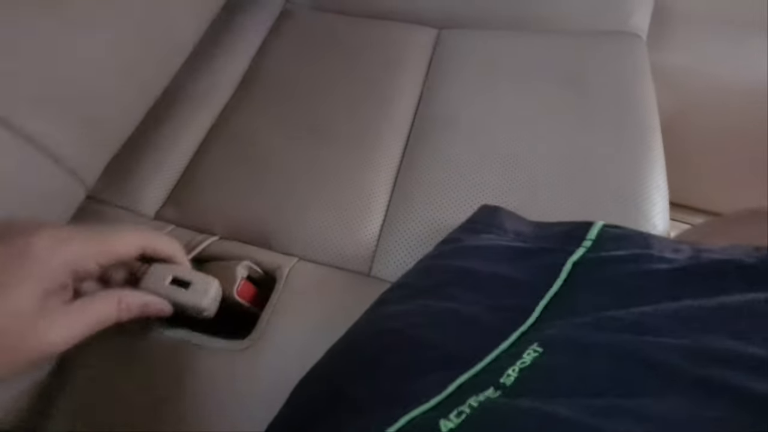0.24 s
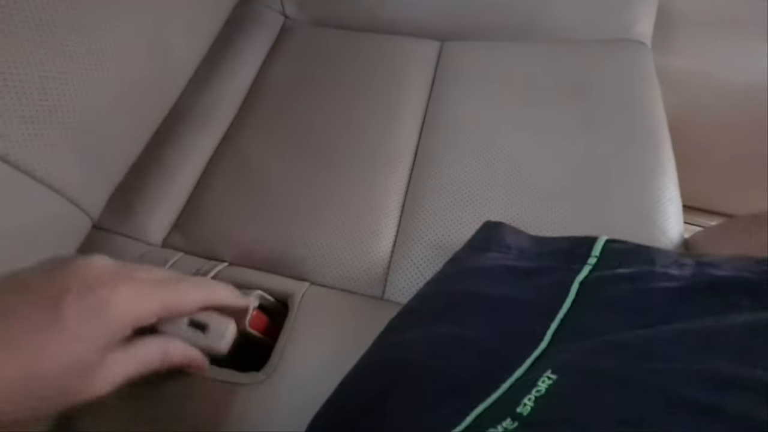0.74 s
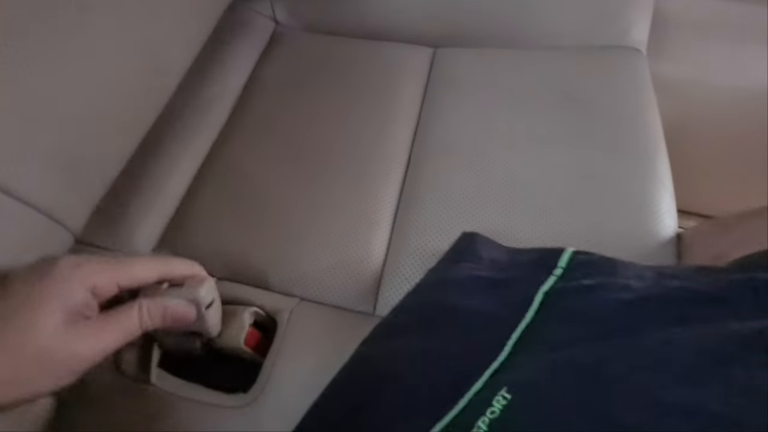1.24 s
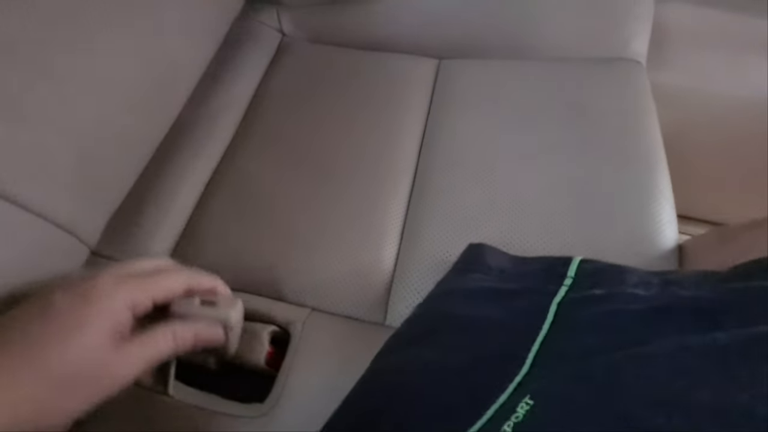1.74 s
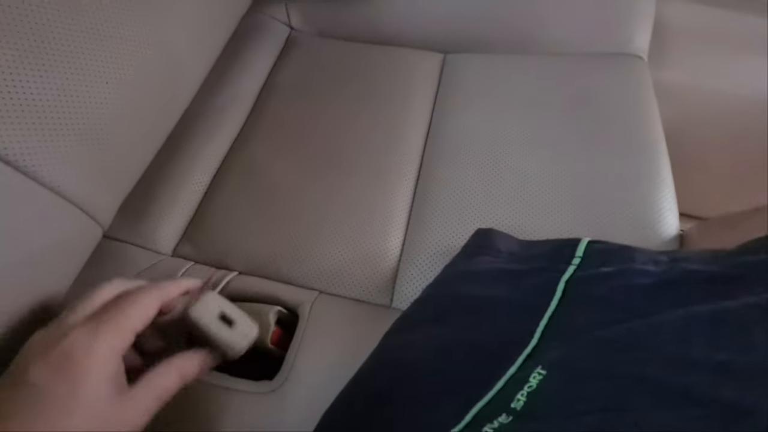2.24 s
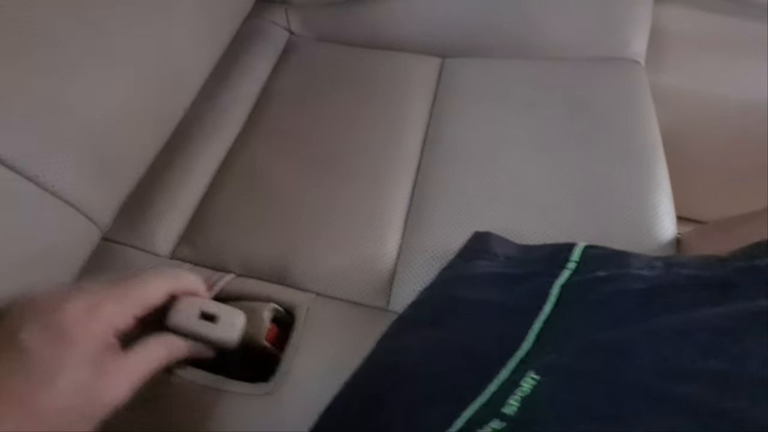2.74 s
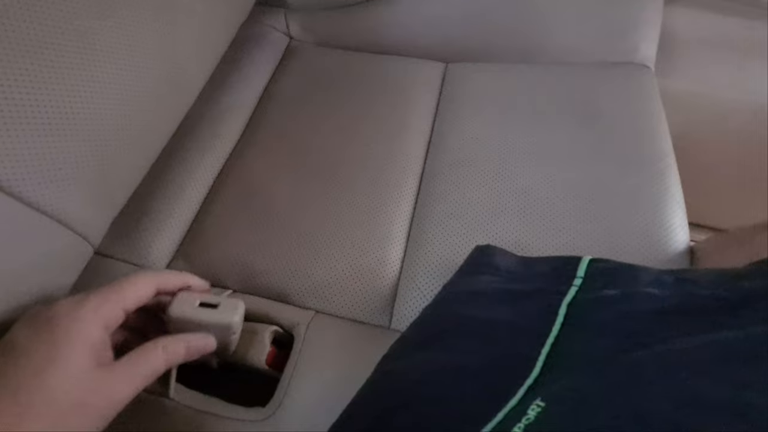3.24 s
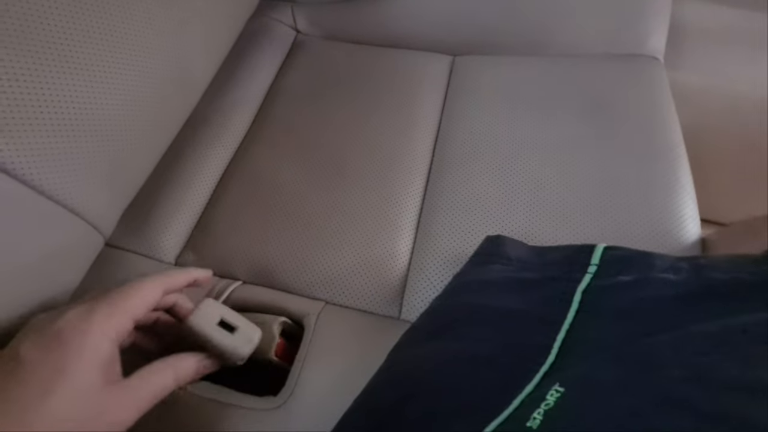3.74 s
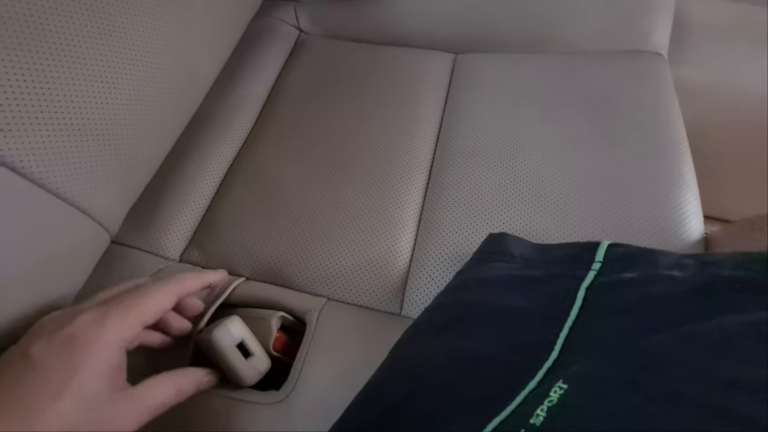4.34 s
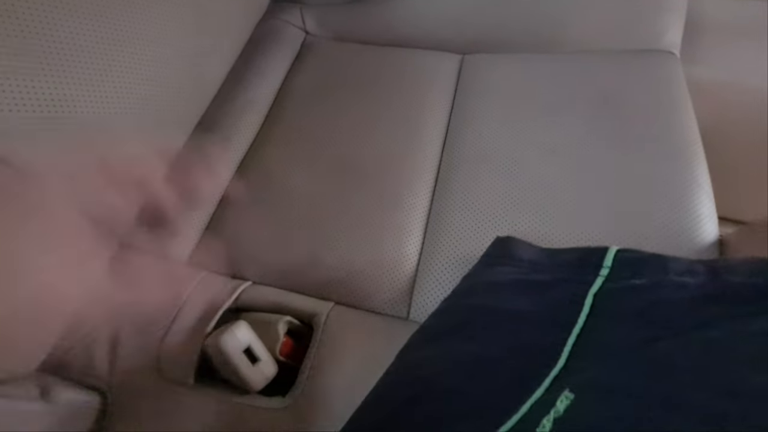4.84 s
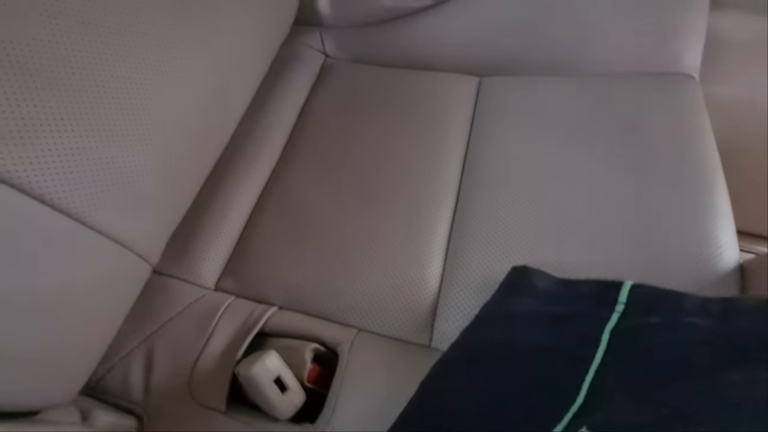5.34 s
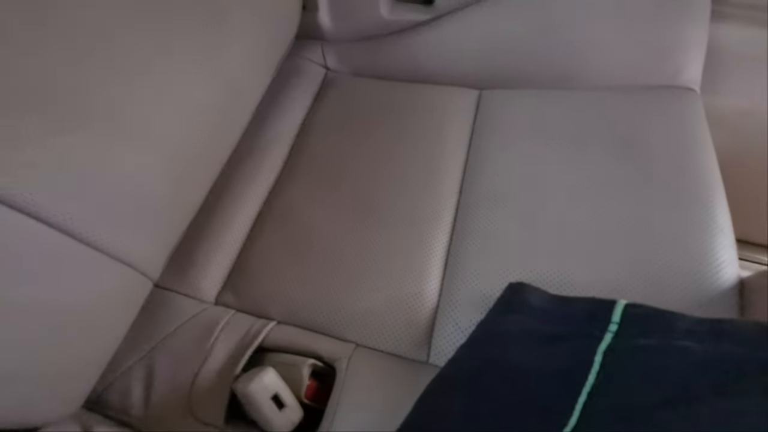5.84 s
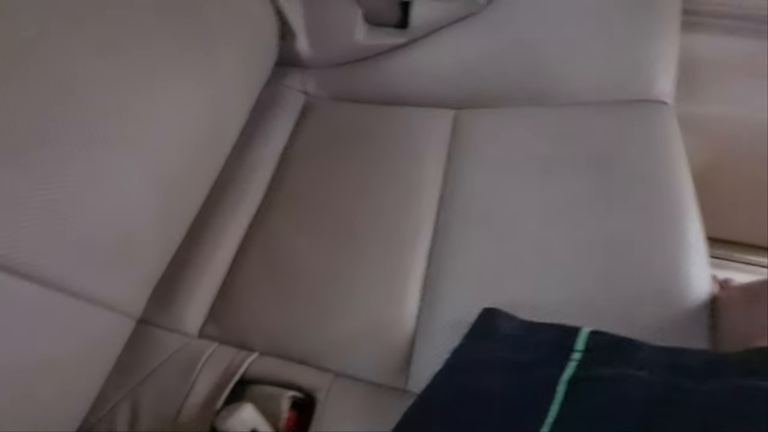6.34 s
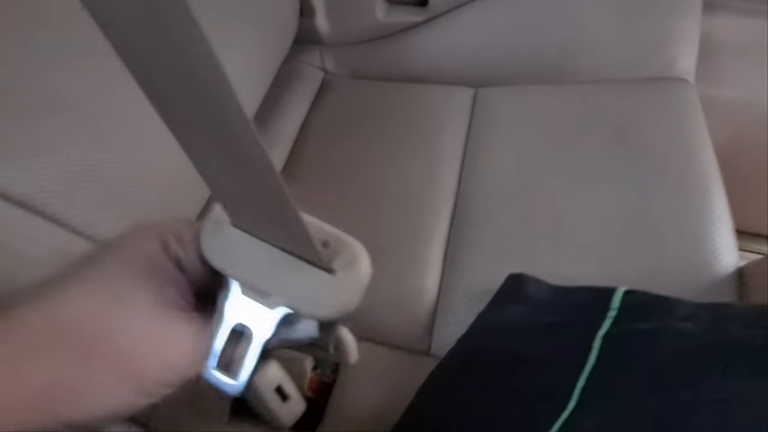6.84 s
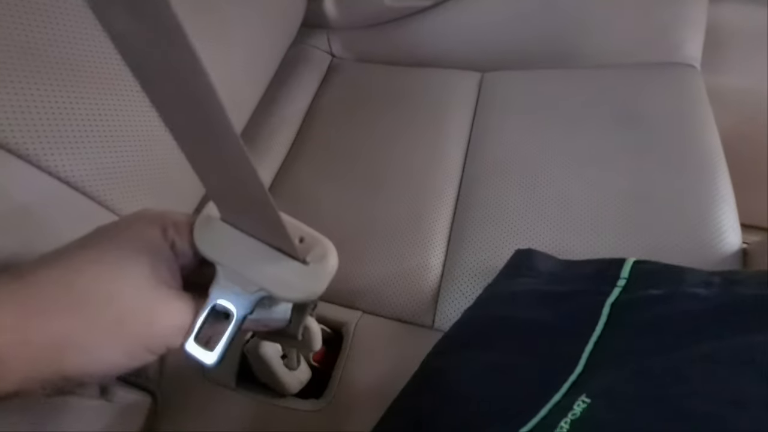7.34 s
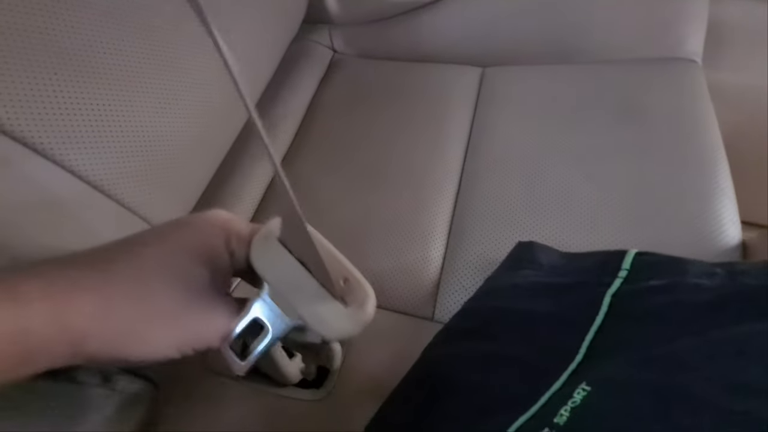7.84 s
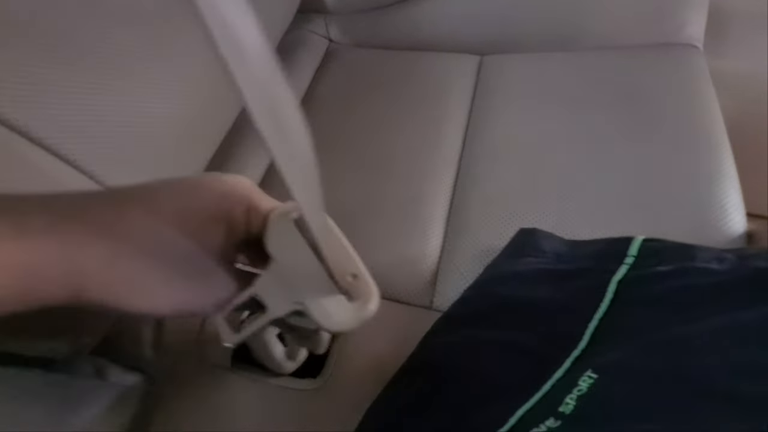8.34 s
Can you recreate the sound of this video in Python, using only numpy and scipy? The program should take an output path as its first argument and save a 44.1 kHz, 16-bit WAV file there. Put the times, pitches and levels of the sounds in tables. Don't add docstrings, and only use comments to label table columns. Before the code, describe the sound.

Inside a quiet parked car, a hand fiddles with a plastic seat-belt buckle, which clatters loudly, then belt webbing whirs out and a metal latch clicks.

```python
import sys
import numpy as np
from scipy import signal
from scipy.fft import rfft, irfft, next_fast_len
from scipy.io import wavfile
from scipy.ndimage import map_coordinates

SR = 44100
rng = np.random.default_rng(int(sys.argv[2]) if len(sys.argv) > 2 else 0)


def unload_audio(sound):
    columns = np.transpose(np.atleast_2d(sound))
    steps = np.round(np.clip(columns, -1, 1) * 32767)
    wavfile.write(sys.argv[1], SR, steps.astype(np.int16))


def boost(x):
    u = np.asarray(x, float) / 20
    return 10 ** u


N = 377937

# time in seconds, effort in dB.
EFFORT = [(0, -0.5), (.4, -4.5), (1.1, 3.5), (1.55, -1.5), (2.0, -1.5), (2.33, -5.5), (2.47, -13),
          (2.75, 1), (3.1, 0), (3.4, -12), (3.65, -8), (4.4, -18), (5.4, -17.5), (6.05, -10.5), (6.45, -9),
          (6.9, -16), (8.57, -18)]
# time in seconds, weave rate in Hz, tone level in dB.
PULL_CURVE = [(6.08, 320, -84), (6.19, 513, -69), (6.27, 705, -78), (6.385, 1030, -70), (6.49, 1180, -68),
              (6.54, 1160, -70), (6.6, 970, -72), (6.72, 450, -65), (6.86, 230, -84)]
PORT_SHARES = (0.74, 0.79, 1)


def unit(x):
    return x / np.sqrt(np.mean(x ** 2) + 1e-20)


def along(points, hz):
    f, v = np.transpose(points)
    return np.interp(np.log(hz + 1), np.log(f + 1), v)


def curves(rows, silent=-130):
    s, *cols = np.transpose(rows)
    return [np.interp(np.arange(N) / SR, s, c, silent, silent) for c in cols]


def wobble(rate):
    at = np.arange(0, N + 6, 6)
    knots = rng.standard_normal(int(N * rate / SR) + 4)
    return np.interp(np.arange(N), at, map_coordinates(knots, [at * rate / SR]))


def filtered(x, response):
    m = 2 * next_fast_len(N // 2 + SR // 5)
    return irfft(rfft(x, m) * response(np.fft.rfftfreq(m, 1 / SR)), m)[..., :N]


def resonances(modes):
    def response(f):
        return sum((-1) ** k * boost(db) * 1j * f * w / (c * c - f * f + 1j * f * w)
                   for k, (c, w, db) in enumerate(modes))
    return response


def ring(modes, t, attack, scatter_db):
    decays = sum(boost(db + scatter_db * rng.normal() - 60 * t / t60) * np.sin(2 * np.pi * hz * t)
                 for hz, db, t60 in modes)
    return (1 - np.exp(-t / attack)) * decays


def rush(spectrum, alike, lift=np.ones_like):
    def response(hz):
        turn = np.arccos(np.clip(along(alike, hz), -1, 1)) / 2
        return boost(along(spectrum, hz)) * lift(hz) * [np.cos(turn), np.sin(turn)]
    mid, side = filtered(rng.standard_normal((2, N)), response)
    return unit(np.array([mid + side, mid - side]))


def panned(x, pan_db):
    return x * boost([[pan_db / 2], [-pan_db / 2]])


def spread(hiss, share):
    return np.array([hiss, np.sqrt(1 - share) * hiss + np.sqrt(share) * np.roll(hiss, N // 3)])


def ahead(pair):
    return np.array([pair[0], np.roll(pair[1], -round(.00016 * SR))])


def strokes(rows):
    t = np.arange(0, N + 64, 64) / SR
    fade_db = 17.5
    gain = sum(boost(db - fade_db * np.abs(t - s) / length) for s, length, db in rows)
    return np.interp(np.arange(N) / SR, t, gain)


def squeak(rows, partials, flutter_db):
    out = np.zeros(N)
    on = slice(int(rows[0][0] * SR) + 1, int(rows[-1][0] * SR))
    hz, db = (c[on] for c in curves(rows))
    phase = 2 * np.pi * np.cumsum(hz) / SR
    overtones = sum(boost(level) * np.sin(k * phase) for k, level in partials)
    out[on] = boost(db) * (np.sin(phase) + overtones)
    return boost(flutter_db) * out


def speed_db():
    top_rate_hz = 1180
    return 20 * np.log10(np.maximum(curves(PULL_CURVE)[0], 1) / top_rate_hz)


def microphone_hiss():
    # frequency in Hz, density in dB per Hz.
    hiss_spectrum = [(88, -31), (150, -8), (330, -3.5), (866, -14), (3200, -21.5), (5200, -34.5),
                     (8800, -43.5), (15800, -36)]
    # frequency in Hz, left-right likeness from -1 to 1.
    likeness = [(60, 0.94), (180, -0.33), (550, 0.3), (1650, -0.1), (4970, -0.28), (15000, 0.96)]
    # frequency in Hz, width in Hz, level in dB.
    port_modes = [(6480, 500, 16.5), (12400, 2500, -11.5)]
    return boost(-68) * rush(hiss_spectrum, likeness, lambda f: np.abs(1 + resonances(port_modes)(f)))


def handling():
    # frequency in Hz, density in dB per Hz.
    rumble_spectrum = [(12, -46.5), (20, -7), (40, 5), (105, -3), (178, -17), (264, -7), (450, -18.5),
                       (800, -100)]
    # level in dB at effort 0, growth in dB per dB of effort.
    sway_law = (-50.5, 0.52)
    # level in dB at effort 0, growth in dB per dB of effort.
    cushion_law = (-52, 1.01)
    # level in dB at effort 0, growth in dB per dB of effort.
    leather_law = (-61.5, 0.94)
    # level in dB at top speed, growth in dB per dB of speed.
    spool_law = (-52.5, 1.1)
    effort_db, = curves(EFFORT)
    sway_gain, cushion_gain, leather_gain = (boost(db + grows * effort_db)
                                             for db, grows in (sway_law, cushion_law, leather_law))
    leather_gain = leather_gain + boost(spool_law[0] + spool_law[1] * speed_db())
    low = rush(rumble_spectrum, [(30, 0.91), (400, 0.93)])
    low_hz, high_hz = 70, 170
    sway = filtered(low, lambda f: 1 / (1 + (f / low_hz) ** 6))
    leather = filtered(low, lambda f: 1 - 1 / (1 + (f / high_hz) ** 6))
    cushion = (low - sway - leather) * boost(3.5 * wobble(21))
    lumpy_leather = leather * boost(4 * wobble(30))
    return sway_gain * unit(sway) + cushion_gain * unit(cushion) + leather_gain * unit(lumpy_leather)


def rubbing():
    # frequency in Hz, density in dB per Hz.
    crease = [(700, -30), (1000, -5), (1500, -0.5), (2300, -3), (3000, -24), (6000, -120)]
    # frequency in Hz, density in dB per Hz.
    skin = [(1500, -38.5), (2400, -5), (3200, -3), (4100, -6.5), (5000, -13), (8000, -63.5)]
    # frequency in Hz, density in dB per Hz.
    fibre = [(3200, -29.5), (4800, -3.5), (6500, -1), (8500, -7.5), (12000, -6.5), (15800, -19.5)]
    # frequency in Hz, width in Hz, level in dB.
    well_modes = [(544, 290, -0.5), (800, 410, -3.5)]
    # frequency in Hz, width in Hz, level in dB.
    guide_modes = [(659.4, 60, -7), (765, 31.6, -14)]
    # peak in seconds, length in seconds, level, brightness and hollowness in dB.
    rubs = [(0.062, .08, -65, -8.5, 13.5), (0.682, 0.024, -59.5, -19, 7), (0.774, .1, -64.5, -4.5, 8),
            (0.963, .12, -64.5, -3, 6.5), (1.242, .07, -67, -5, 6.5), (1.379, .025, -69, -1, -10),
            (1.539, .03, -53.5, -5.5, 6.5), (1.654, .05, -79.5, 0, 20), (1.833, .06, -68.5, 2, 9),
            (1.936, .06, -68, -6, 12.5), (2.308, 0.021, -56, -20.5, 3.5), (2.546, .04, -66.5, -5.5, -8),
            (2.699, .07, -63.5, -16.5, 7), (2.753, .04, -68.5, -6.5, 14), (2.851, .03, -53.5, -15, -0.5),
            (3.009, .1, -73.5, -7.5, 8.5), (4.056, 0.081, -66, -21.5, 5), (5.589, .05, -71.5, -6.5, -23),
            (5.965, .035, -61, 11, -1), (7.711, .06, -89, 11, -11.5)]
    # peak in seconds, length in seconds, level in dB.
    palm = [
        (1.296, 0.23, -64.5),
        (2.06, 0.36, -64.5),
        (4.2, 0.21, -73.5),
        (8.299, 0.15, -79.5),
    ]
    # peak in seconds, length in seconds, level in dB.
    swells = [
        (5.977, 0.014, -48),
        (6.15, 0.03, -63),
        (6.176, 0.032, -49.5),
        (6.342, 0.076, -55),
        (6.675, 0.065, -48),
        (6.951, 0.17, -68),
        (7.796, .12, -64.5),
    ]
    # crease, skin, fibre and hollow in dB at effort 0, growth in dB per dB of effort.
    contact = (-73, -76, -78, -71.5, 0.77)
    # level in dB at top speed, growth in dB per dB of speed.
    drag = [
        (-59.5, 1.5),
        (-57, 1.7),
        (-61, 1.66),
        (-50.5, 1.9),
    ]

    def colours(f):
        hiss_colours = [boost(along(c, f)) for c in (crease, skin, fibre)]
        return hiss_colours + [resonances(c)(f) ** 2 for c in (well_modes, guide_modes)]

    grains = rng.standard_normal((5, N)) * boost(.8 * wobble(30))
    grains = grains * boost([2.8 * wobble(300) for _ in range(5)])
    *hisses, well, guide = map(unit, filtered(grains, colours))
    s, length, db, bright_db, hollow_db = np.transpose(rubs)
    layers = [(0, []), (0.5 + 0.88 * bright_db, palm), (bright_db, []), (hollow_db, swells)]
    effort_db, speed = curves(EFFORT)[0], speed_db()
    gains = []
    for (lift, extra), rest_db, (drag_db, grows) in zip(layers, contact, drag):
        stroked = strokes(list(zip(s, length, db + lift)) + extra)
        resting = boost(rest_db + contact[-1] * effort_db)
        gains.append(stroked + resting + boost(drag_db + grows * speed))
    *gains, hollow_gain = gains
    hiss = sum(g * spread(h, share) for g, h, share in zip(gains, hisses, PORT_SHARES))
    belt_out = np.arange(N) > 5 * SR
    return panned(hiss + hollow_gain * np.where(belt_out, guide, well), pan_db=-4.0)


def ticks():
    # time in seconds, peak in dB, sheen in dB, ping in Hz.
    turned = [(0.1178, -55.5, -26, 1930), (.289, -57, -8, 6440), (.381, -56, -11.5, 2210),
              (.4569, -55, -17.5, 3360), (.535, -61, -10.5, 1970), (.571, -67, -40, 2000),
              (.606, -59.5, -9.5, 3720), (.66, -59, -30, 1000), (0.6702, -51, -31, 1060),
              (0.678, -53, -35, 800), (.6848, -54, -37, 990), (.69, -59, -25, 1030),
              (.7372, -43.5, -23, 2150), (.7645, -55, -7, 4170), (0.7625, -47, -10.5, 2970),
              (.8644, -53.5, -31, 1520), (1.0885, -50, -18, 2800), (1.11, -53, -8, 4200),
              (1.1967, -65, -24, 2830), (1.2686, -53, -12, 4000), (1.278, -54.5, -10, 5950),
              (1.335, -60, -14, 3740), (1.393, -50, -12, 2540), (1.4035, -43, -11.5, 4480),
              (1.503, -56, -22, 1780), (1.512, -54, -16, 2600), (1.529, -54, -16, 3020),
              (1.551, -52, -16, 1610), (1.5193, -50, -23, 1910), (1.5405, -52, -30, 2140),
              (1.6004, -55.5, -7, 2480), (1.6224, -51, -16, 2490), (2.059, -48.5, -13.5, 3030),
              (1.776, -58, -10.5, 1570), (2.15, -63, -11, 3870), (2.2872, -57.5, -27, 1460),
              (2.452, -57.5, -11.5, 1050), (2.597, -62, -10, 6540), (2.672, -66, -25, 1440),
              (2.7003, -58, -24, 1580), (2.3048, -55, -21, 2080), (2.514, -69, 0, 9000),
              (2.531, -56.5, -17, 4330), (2.692, -56, -25, 2390), (2.7164, -48.5, -14, 1920),
              (2.755, -46, -18.5, 2210), (3.0428, -49.5, -17, 2750)]
    # time in seconds, peak in dB, sheen in dB, ping in Hz.
    latch = [(5.585, -67, -14, 2600), (6.8, -70, -8, 3700), (6.152, -58, -13, 1400),
             (5.673, -58, -11, 4200), (5.787, -56.5, -15, 4400), (5.9695, -40, -8, 3950),
             (5.9894, -49.5, -56.5, 1600), (6.0407, -53, -6, 7050), (5.4, -52, -9, 4000),
             (6.437, -44.5, -19, 2540), (7.689, -68, -5, 3069), (7.924, -61, -14, 3294),
             (8.1025, -57, -9, 3306), (8.102, -42, -11, 9700), (8.528, -54, -7.5, 6800),
             (8.532, -51, -26, 4100), (8.103, -50, -13, 2490), (6.2104, -51, -14, 3200),
             (6.4708, -47, -19, 3000)]
    # time in seconds, peak in dB, sheen in dB, core in dB, t60 in seconds.
    clacks = [(2.8536, -29.5, -20.5, 4, 0.017), (2.8739, -16.5, -30.5, -8, 0.032),
              (2.886, -25.5, -24, -7.5, 0.012), (2.837, -41.5, -16, -5.5, 0.0065),
              (2.8817, -32, -18.5, -10, .01), (2.907, -26.5, -14, -11.5, .015),
              (2.928, -34, -16, -6, 0.018), (2.957, -37, -16, -6, .012), (2.8988, -6.5, -16, -13.5, 0.014),
              (2.918, -26.5, -22.5, -7.5, 0.021), (2.947, -21.5, -26, -2.5, 0.014),
              (2.9713, -44, -9.5, -8, 0.023)]
    # time in seconds, peak in dB, ping in Hz.
    rattle = [(6.3135, -50, 2490), (6.3517, -51, 2970), (6.436, -48, 2530), (6.4704, -42.5, 2800),
              (6.5374, -49, 2250), (6.595, -46.5, 2410), (6.6301, -46, 3140), (6.6521, -43, 2780)]
    # frequency in Hz, width in Hz, level in dB.
    case_modes = [(2040, 1700, 0.5), (3030, 860, 5.5), (4080, 910, -0.5)]
    # frequency in Hz, width in Hz, level in dB.
    steel_modes = [(6530, 2800, 3), (9000, 2000, 3), (12176, 4100, 0.5)]
    # frequency in Hz, width in Hz, level in dB.
    core_modes = [(975, 220, 0.5), (1480, 350, 6)]
    tick_t60, latch_t60, core_base_db = .022, 0.024, -20.5
    dull_core = 0.56
    rows = [(*r, t60, core_base_db - dull_core * r[2])
            for table, t60 in ((turned, tick_t60), (latch, latch_t60)) for r in table]
    rows += [(s, db, sheen_db, 1720, t60, core_db) for s, db, sheen_db, core_db, t60 in clacks]
    rows += [(s, db - 1.5, -23, hz, tick_t60, core_base_db) for s, db, hz in rattle]

    t = np.arange(SR // 20) / SR
    cracks = np.zeros((4, 2, N + len(t)))
    apart = 0.42
    onset = 1 - np.exp(-t / 0.000092)
    for s, db, sheen_db, ping_hz, t60, core_db in rows:
        at = slice(round(s * SR), round(s * SR) + len(t))
        levels = (db, db + sheen_db + 9, db + core_db + 11.0)
        for layer, level, slow in zip(cracks, levels, (1.05, .8, 1.4)):
            left, other = rng.standard_normal((2, len(t)))
            right = np.sqrt(1 - apart) * left + np.sqrt(apart) * other
            layer[:, at] += boost(level + 5.5 - 60 * t / (slow * t60)) * onset * [left, right]
        cracks[3, :, at] += ring([(ping_hz, db - 2.5, .8 * t60)], t, attack=0.0001, scatter_db=1.5)

    def bodies(f):
        case_response = resonances(case_modes)(f) ** 2
        steel_response = resonances(steel_modes)(f) ** 2 / (1 + 1j * f / 14000) ** 3
        core_response = resonances(core_modes)(f) / (1 + 1j * f / 4000) ** 2
        return np.array([case_response, steel_response, core_response])[:, None]

    case, steel, core = filtered(cracks[:3], bodies)
    case_and_ping = panned(case + ahead(cracks[3, :, :N]), pan_db=-4.5)
    return case_and_ping + panned(steel, pan_db=-3) + panned(core, pan_db=-1.5)


def cushion_pushes():
    # time in seconds, peak in dB, frequency in Hz.
    pushes = [(0.199, -40.5, 120), (0.388, -36, 95), (0.948, -28.5, 96), (1.4, -34.5, 83.4),
              (1.553, -29.5, 71), (2.047, -43, 124), (2.748, -40, 86), (3.12, -44.5, 70),
              (3.185, -38.5, 108.6), (3.255, -37.5, 100.2), (3.464, -41, 97.8), (3.557, -40, 95),
              (3.715, -43, 99.8), (5.112, -53.5, 91.3), (8.124, -43.5, 125)]
    t = np.arange(SR // 5) / SR
    out = np.zeros(N + len(t))
    for s, db, hz in pushes:
        out[round(s * SR):][:len(t)] += ring([(hz, db + 3.5, .11)], t, attack=0.0065, scatter_db=-1)
    return panned(out[:N], pan_db=0.5)


def knocks():
    # time in seconds, peak in dB, low mode in Hz, high mode in dB.
    well_knocks = [(.391, -49, 155, -3), (0.545, -39.5, 260, -15), (0.571, -34.5, 286, -19),
                   (.67, -39, 322, -4), (0.737, -41.5, 202, 6), (0.819, -36, 277, -27),
                   (0.943, -50, 169.4, -5), (1.188, -41, 161, -13), (1.392, -41.5, 300, -2),
                   (1.403, -43, 180, 0), (1.611, -46, 300, -0.5), (1.636, -30, 348, -9),
                   (2.31, -45, 294, 1), (1.5428, -34.5, 147, -8), (1.625, -35, 298, -4.5),
                   (1.776, -35.5, 284, -21), (2.05, -31.5, 153, -26), (2.166, -35.5, 318, -13),
                   (2.287, -35.5, 170, -17), (2.527, -39.5, 276, -20.5), (2.731, -39.5, 148, -4),
                   (2.752, -41.5, 202, 1), (3.614, -57.5, 298, -1), (3.658, -42, 265, -18),
                   (3.68, -44, 270, -19), (4.045, -53, 298.6, -2), (4.09, -50, 320, -20),
                   (4.115, -44.5, 311, -20)]
    # time in seconds,
    # peak in dB, low mode in Hz, high in dB, t60 in seconds.
    trim_bumps = [(5.116, -29, 226, -42.5, 0.0093), (5.519, -39, 255, -16.5, 0.067),
                  (5.532, -30.5, 219, -23.5, 0.05), (5.671, -39, 169, -39, 0.04),
                  (5.7, -48, 246, -30.5, .05), (5.553, -36.5, 230, -33, .05), (5.808, -43, 222, -34, .04),
                  (5.791, -42, 198, -16.5, 0.059), (5.969, -33, 211, -25, 0.14),
                  (5.986, -21, 280, -7.5, 0.077), (6.316, -39.5, 217, -26, 0.16),
                  (6.415, -34.5, 251, -7, 0.069), (6.436, -22.5, 242, -19, 0.024),
                  (6.549, -35.5, 268, -13, 0.056), (2.9034, -11, 290.2, -40, .05),
                  (2.924, -20.5, 330, -40, .04), (2.948, -23, 308.5, -39, .06),
                  (2.968, -18, 364, -26, 0.11), (8.102, -34.5, 250, -9.5, 0.031),
                  (8.114, -39, 241, -6, .04), (8.124, -27.5, 192.7, -21, 0.027),
                  (8.5295, -38, 259, -3.5, 0.026)]
    cycles, well_hz, trim_hz = 10, 576, 603
    rows = [(*r, cycles / r[2], well_hz) for r in well_knocks] + [(*r, trim_hz) for r in trim_bumps]
    t = np.arange(SR // 5) / SR
    out = np.zeros(N + len(t))
    for s, db, low_hz, high_db, t60, high_hz in rows:
        scattered_hz = high_hz * (1 + 0.08 * rng.normal())
        modes = [(low_hz, -2, t60), (scattered_hz, high_db + 10.0, 0.53 * t60)]
        out[round(s * SR):][:len(t)] += boost(db) * ring(modes, t, attack=0.00092, scatter_db=0.0)
    return panned(out[:N], pan_db=0.5)


def stick_slip():
    # time in seconds, frequency in Hz, level in dB.
    rasp = [(.662, 950, -72), (.673, 1000, -60), (.69, 1055, -55), (.699, 1070, -72)]
    # time in seconds, frequency in Hz, level in dB.
    strap_squeak = [(.82, 530, -68), (.87, 590, -60), (.9, 620, -55), (.94, 665, -52), (.965, 620, -59),
                    (1.0, 570, -66)]
    # time in seconds, frequency in Hz, level in dB.
    chirp = [(3.07, 2660, -84), (3.092, 2710, -74), (3.166, 2688, -77), (3.19, 2600, -82),
             (3.214, 2458, -79), (3.24, 2320, -80)]
    flutter_db = 1.5 * wobble(40)
    tones = squeak(rasp, [(.55, 3), (1.75, -6)], 2 * flutter_db + 3)
    tones = tones + squeak(strap_squeak, [], 2 * flutter_db + 4) + squeak(chirp, [], flutter_db + 4)
    octave = [(s, 2 * hz, db - 9) for s, hz, db in chirp[:4]]
    tones = tones + squeak(octave, [], 2 * flutter_db + 4)
    return panned(ahead([tones, tones]), pan_db=-4.0)


def finger_swipes():
    # time in seconds, frequency in Hz, level in dB.
    swipes = [
        [(1.16, 2500, -81), (1.22, 2900, -61), (1.29, 3410, -63), (1.37, 3610, -57.5), (1.395, 3730, -68),
         (1.47, 3480, -70)],
        [(1.82, 2200, -79), (1.88, 2490, -63), (1.95, 3110, -66.5), (2.05, 3370, -59), (2.16, 3810, -67.5),
         (2.27, 3900, -85)],
    ]
    flutter_db = 1.5 * wobble(40)
    tones = sum(squeak(rows, [], flutter_db + 2.5) for rows in swipes)
    carrier = wobble(1600)
    return panned(spread(carrier, PORT_SHARES[1]) * tones, pan_db=-4.0)


def bounces():
    # time in seconds, peak in dB, shell in dB, boom in dB.
    falls = [
        (2.853, -21, 5.5, -11),
        (2.8755, -3, -8, -4.5),
        (2.902, -6.5, -2.5, -12),
        (2.948, -15.5, -0.5, 1.5),
        (2.975, -27.5, -23, -8),
    ]
    # frequency in Hz, level in dB, t60 in seconds.
    seat_modes = [(270, -0.5, 0.042), (290, 4, 0.045), (346, -5.5, 0.096), (385, -4.5, 0.11),
                  (440, -14.5, 0.21)]
    # frequency in Hz, level in dB, t60 in seconds.
    shell_modes = [(543, -3.5, 0.0533), (645, 6.5, 0.023), (610.8, 1.5, 0.053), (680, -9, 0.055),
                   (806, -6, 0.086)]
    # frequency in Hz, level in dB, t60 in seconds.
    boom_modes = [(100, -27.5, 0.6), (125, -9, 0.27), (161, -8.5, 0.18), (195, -5, 0.12)]
    t = np.arange(SR * 2 // 3) / SR
    out = np.zeros(N + SR)
    for s, db, shell_db, boom_db in falls:
        blow = ring(seat_modes, t, attack=0.0015, scatter_db=1)
        blow = blow + boost(shell_db) * ring(shell_modes, t, attack=0.0011, scatter_db=1.5)
        blow = blow + boost(boom_db) * ring(boom_modes, t, attack=0.0038, scatter_db=2.4)
        out[round(s * SR):][:len(t)] -= boost(db - 6.0) * blow
    return panned(out[:N], pan_db=-1.0)


def traffic():
    # time in seconds, nearness 0-1, level in dB.
    passing = [
        (4.3, 0.17, -78),
        (4.45, 0.34, -75),
        (5.3, 0.4, -71),
        (5.9, 1, -70.5),
        (6.5, 1, -69.5),
    ]
    # frequency in Hz, width in Hz, level in dB.
    tyres = [
        [(1070, 26, -1), (1280, 150, 2)],
        [(1244, 44, 4.5), (1407, 140, 0)],
    ]
    near, db = curves(passing)
    near = np.clip(near, 0, 1)
    noise = rng.standard_normal((2, N))
    far_roar, near_roar = map(unit, filtered(noise, lambda f: [resonances(c)(f) for c in tyres]))
    roar = np.sqrt(1 - near) * far_roar + np.sqrt(near) * near_roar
    return panned(boost(db + 1.4 * wobble(9.0)) * roar, pan_db=-4.0)


def seat_creaks():
    # time in seconds, frequency in Hz, level in dB.
    creak = [(4.75, 8000, -98), (4.795, 8460, -85), (4.83, 8400, -87), (4.86, 8000, -95), (4.94, 7950, -96),
             (4.97, 7700, -110), (4.995, 8060, -96), (5.02, 8010, -89), (5.05, 7400, -100)]
    # time in seconds, frequency in Hz, level in dB.
    seam = [(4.77, 11350, -104), (4.79, 11540, -90), (4.85, 11250, -100), (4.9, 11300, -94),
            (4.93, 11540, -90), (4.96, 11470, -90), (4.98, 11200, -100), (5.01, 11330, -93),
            (5.03, 11300, -104)]
    flutter_db = 1.5 * wobble(40)
    tones = squeak(creak, [(.41, -5), (.85, -4)], 1.5 * flutter_db + 12)
    tones = tones + squeak(seam, [], 1.5 * flutter_db + 10)
    return panned(ahead([tones, tones]), pan_db=-4.0)


def webbing():
    # multiple of the weave rate, level in dB.
    whir = [(.215, 3), (1.29, 1), (2, 3.5), (2.15, -3)]
    # level in dB at top speed, growth in dB per dB of speed.
    over_law = (-64.5, 1.7)
    # peak in seconds, length in seconds, level in dB.
    bites = [
        (6.32, 0.023, -68),
        (6.385, 0.027, -54.5),
        (6.48, 0.034, -56.5),
        (6.555, 0.021, -66),
    ]
    # time in seconds, frequency in Hz, level in dB.
    sing = [(6.214, 640, -62), (6.227, 648, -34), (6.236, 660, -50), (6.246, 668, -31), (6.257, 672, -32),
            (6.269, 676, -28), (6.279, 680, -40), (6.287, 676, -36), (6.299, 672, -56)]
    hz, tone_db = curves(PULL_CURVE)
    uneven_hz = np.maximum(hz, 0) * (1 + 0.016 * wobble(70))
    phase = 2 * np.pi * np.cumsum(uneven_hz) / SR
    over = sum(boost(level + 4.5 * wobble(30)) * np.sin(k * phase) for k, level in whir)
    tone = (boost(tone_db + 5.2 * wobble(29)) + strokes(bites)) * np.sin(phase)
    guided = filtered(tone, lambda f: 1 + resonances([(665, 90, 19)])(f))
    overtones = boost(over_law[0] + over_law[1] * speed_db()) * over
    return ahead(panned(guided + overtones + squeak(sing, [(2, -31)], 2.0), pan_db=-2.5))


def ports(pair, lead, wet_db):
    # frequency in Hz, t60 in seconds.
    cabin_t60 = [(150, 0.22), (1000, 0.089), (10000, 0.043)]
    hz, t, z = signal.stft(rng.standard_normal((2, SR // 4)), SR, nperseg=256)
    z[1, hz < 700] = z[0, hz < 700]
    tail = signal.istft(z * boost(-60 * t / along(cabin_t60, hz)[:, None]), SR, nperseg=256)[1]
    tail = np.pad(tail / np.linalg.norm(tail[0]), ((0, 0), (90, 0)))

    def response(f):
        cabin = 1 + boost(wet_db) * rfft(tail, 2 * len(f) - 2)
        return cabin * np.exp(1j * np.pi * f * lead * np.array([[1], [-1]]))

    return filtered(pair, response)


def scene():
    contacts = rubbing() + ticks() + cushion_pushes() + knocks() + bounces()
    tones = stick_slip() + finger_swipes() + seat_creaks() + webbing()
    near = ports(contacts + tones + traffic(), lead=.0002, wet_db=-9)
    return microphone_hiss() + handling() + near


def band_limit(x):
    return signal.sosfilt(signal.butter(12, 16310, fs=SR, output="sos"), x)


def record(dry):
    top, cut_hz, top_hz = .93, 30, 15780
    held = dry / (1 + np.abs(dry / top) ** 8) ** (1 / 8)
    mix = filtered(held, lambda f: (f < top_hz) * (1j * f / (cut_hz + 1j * f)) ** 2)
    return band_limit(mix)


dry = scene()
out = record(dry)
unload_audio(out)
```